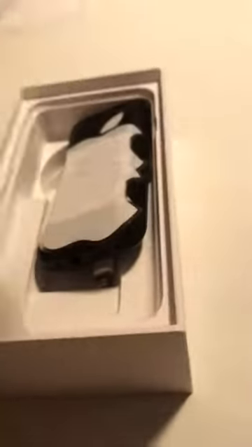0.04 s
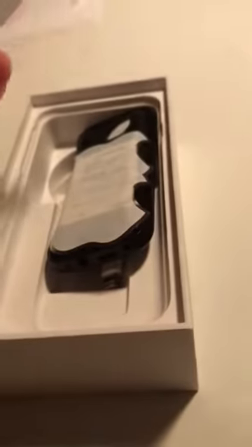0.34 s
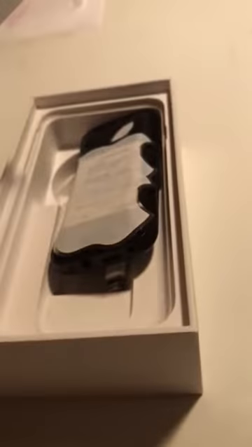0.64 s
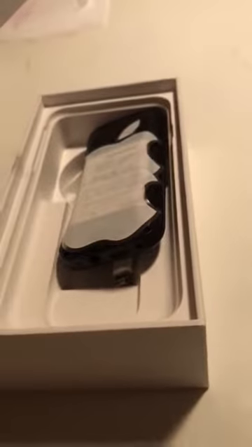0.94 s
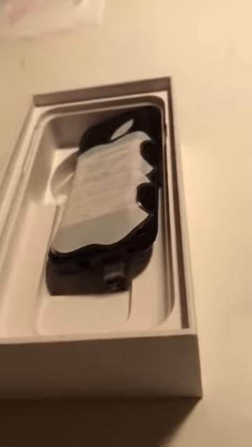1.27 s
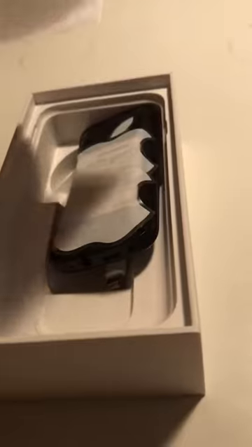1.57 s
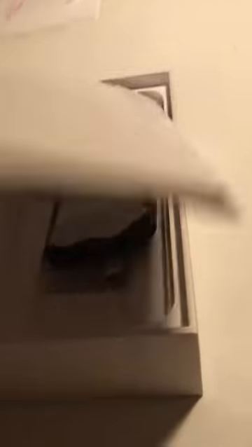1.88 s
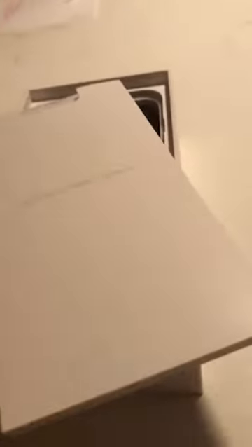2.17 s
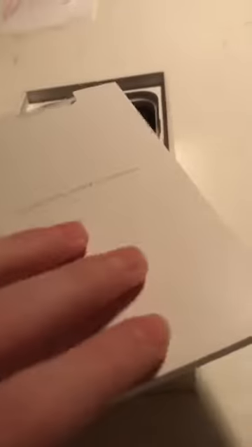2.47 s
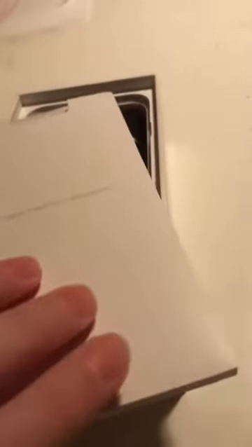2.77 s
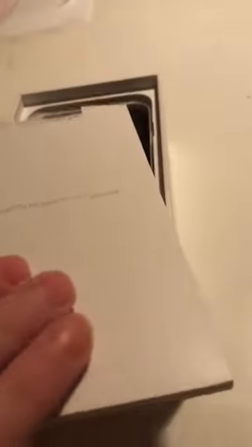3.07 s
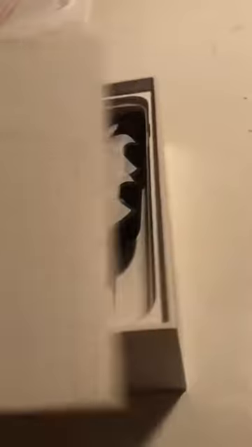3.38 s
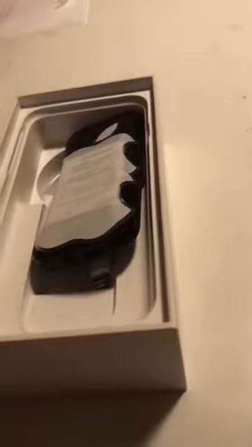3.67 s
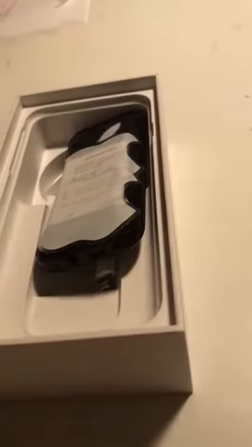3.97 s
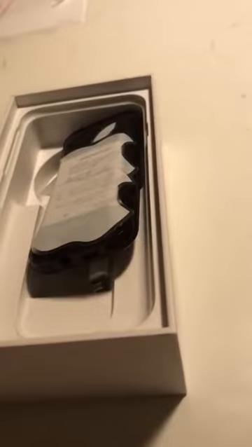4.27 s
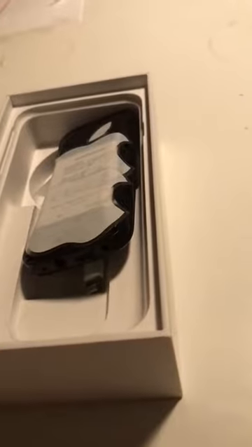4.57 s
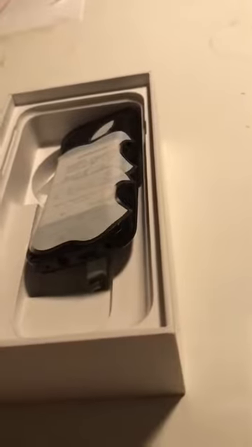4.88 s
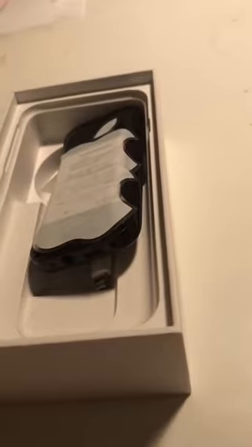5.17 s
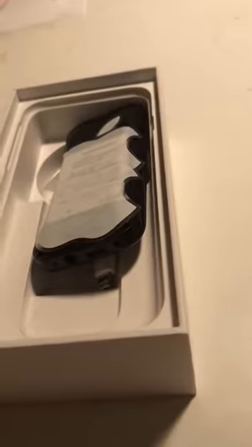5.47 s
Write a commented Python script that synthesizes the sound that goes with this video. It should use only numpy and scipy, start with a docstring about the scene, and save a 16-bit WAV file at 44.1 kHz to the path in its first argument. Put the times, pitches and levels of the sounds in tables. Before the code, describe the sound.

In a small, quiet room, a hand faintly slides a card sleeve, which catches and judders. It rasps over the rim of an open cardboard box and drops on it in a quick clatter, making the desk boom softly. Fingertips stroke the sleeve and draw it off. After two light nudges, a short scrape leads into one sharp click as a phone hits its tray. The microphone is close, with a low hum behind.

```python
"""An opened cardboard phone box stands on a desk in a small, quiet room with a low hum.
A hand slides a card sleeve about, fibres catching and juddering. The sleeve rasps over the rim and drops
on the box in a clatter of edge and face knocks that sets the desk booming. Fingertips stroke the sleeve
and draw it off again. The box is nudged twice, then a short scrape leads into one sharp click as the
phone snaps against its stiff tray. A faint hiss hangs on briefly after the loudest hits."""
import sys
import numpy as np
from scipy import signal
from scipy.fft import rfft, irfft
from scipy.io import wavfile
from scipy.ndimage import uniform_filter1d

SR = 44100
rng = np.random.default_rng(int(sys.argv[2]) if len(sys.argv) > 2 else 0)


def wav_out(sig):
    """Save sig, one row per channel (or a flat mono array), as 16-bit PCM at SR to the path in sys.argv[1]."""
    wavfile.write(sys.argv[1], SR, np.round(np.clip(np.atleast_2d(sig).T, -1, 1) * 32767).astype(np.int16))


N = 248724
TIME = np.arange(N) / SR

# Card knocks on the box edge first, then settles on its face with a clack and a thud.
# Each row: start in seconds, edge level in dB, edge pitch in Hz, grind time in seconds, crack in dB,
# delay until it settles in seconds, face level in dB, face pitch in Hz, thud in dB.
CARD_HITS = [(0.2773, -38.5, 2300, .003, -54, 0.001505, -39, 1750, -61),
             (1.8868, -26.5, 2400, 0.0061, -31, 0.0027, -30.5, 1200, -35),
             (1.894, -29, 1800, .007, -32, 0.0018, -34, 700, -37),
             (1.902, -28, 2100, 0.0087, -32, 0.0083, -45, 900, -37),
             (1.9252, -13, 2550, 0.0015, -23, .002, -32, 1700, -33),
             (1.938, -18.5, 740, .0005, -26, .002, -13.5, 1290, -41),
             (1.941, -24, 1800, .002, -33, .0024, -16.5, 1300, -41),
             (2.0702, -16.5, 720, .0007, -34, .0026, -13, 900, -34.5),
             (2.1094, -7, 4505, .0008, -14.5, .002, -13.5, 1500, -22),
             (2.1117, -12.5, 1450, .002, -23, .0033, -11.5, 1407, -31.5),
             (3.351, -39.5, 1600, 0.00299, -55, 0.013, -46.5, 620, -43),
             (3.3739, -28, 1050, .003, -35.5, .0012, -26.5, 640, -42.5),
             (4.0308, -31, 1613, .003, -37.5, .0046, -39.5, 700, -36),
             (4.168, -45, 1100, .003, -55, .0037, -41, 706, -42.5),
             (4.3239, -12.5, 3100, .001, -27.5, 0.0033, -26, 650, -35)]
# Weightless touches. Each row: start in seconds, level in dB, pitch in Hz, crack in dB.
LIGHT_TOUCHES = [(0.507, -62.5, 2300, -63), (0.538, -62, 5200, -57), (0.838, -58, 2200, -65),
                 (1.9209, -28, 2700, -33), (2.0714, -18.5, 2700, -33), (2.0987, -29, 3000, -41),
                 (2.1183, -28.5, 2700, -34), (2.578, -50, 2700, -63), (3.068, -57.5, 3900, -65),
                 (3.169, -45, 1500, -59.5), (4.1721, -43.5, 1400, -44), (4.3261, -18, 3600, -38.5)]
# The phone hits its tray and rebounds. Each row: start in seconds, strength in dB.
PHONE_SNAPS = [(4.324, 0.5), (4.3258, -10)]

# How each body rings. Each row: pitch in Hz, relative level in dB, time to fall 60 dB in seconds.
BOX_MODES = [(354, -18.5, .03), (535, -15.5, .011), (670, -11, 0.028), (975.4, -15, 0.043),
             (1236, -15, 0.0051), (1430, -12.5, 0.0078), (1656, -15.5, .013), (1850, -14.5, 0.01),
             (2290, -12.5, 0.0049), (2679, -11, 0.007), (3030, -10, .007), (3710, -13, 0.0086),
             (3930, -12, 0.0049), (5430, -18, 0.0046), (5900, -14, 0.0073), (8700, -18.5, 0.0052)]   # the box with its tray
THUD_MODES = [(74.2, -15, 0.022), (111, -6, 0.054), (176, -0.5, 0.047), (262, -18.5, 0.52),
              (308, -3.5, .035), (394.5, -4.5, 0.043)]   # the floor of the box on the desk
TRAY_MODES = [(1380, -15, 0.021), (1450, -16, .022), (1646, -22.5, 0.013), (1886, -11.5, 0.021),
              (2248, -16.5, 0.0098), (2757, -14, 0.0111), (3062, -11, 0.01), (3860, -18, .009),
              (5280, -20.5, .006), (6040, -17, 0.00695), (8300, -27, 0.0059)]   # the stiff tray
DESK_MODES = [(49.9, -36.5, 0.87), (68.5, -45.5, 1.5), (130, -44.5, 1.15)]   # the desk top

# Card and fingers rubbing. Each row: gesture, then start, attack, hold and release in seconds,
# then level and brightness in dB, both before the gesture's own trim.
RUBS = [("slide", 0.0, 0.0023, .16, 0.05, -60, -4.5), ("slide", 0.1595, 0.073, 0.049, 0.023, -58.5, 6.9),
        ("slide", 0.287, 0.013, 0.019, 0.11, -53.5, -0.91), ("slide", 1.446, .018, .005, .035, -59.5, -3.5),
        ("slide", 1.505, .04, .05, .06, -59, .5), ("slide", 1.65, 0.094, .03, .04, -65, -7.5),
        ("rasp", 1.778, .016, .135, .025, -53, -2), ("stroke", 2.513, 0.016, 0.0035, 0.049, -50, 2),
        ("stroke", 2.615, 0.12, .008, 0.019, -51.5, 2), ("drag", 2.74, 0.023, 0.042, 0.062, -58.5, -18),
        ("drag", 2.84, .03, .015, 0.031, -59.5, -9.5), ("drag", 2.91, .015, 0.074, 0.038, -58, -8.5),
        ("drag", 3.115, 0.037, .025, 0.037, -61.5, -15.5), ("drag", 3.19, 0.11, 0.033, .06, -58.5, -12.5),
        ("scrape", 4.294, .006, .01, .018, -41.5, -17)]
# The tone of each gesture. Each row: frequency in Hz, relative noise density in dB.
SLIDE_COLOUR = [(590, -42), (1000, -14.5), (1310, -13.5), (1850, 1.5), (2470, -9), (3050, 0.5), (4840, -9),
                (7270, -6), (7880, -7), (10700, -9), (12300, -5), (15100, -9), (16000, -13.5)]   # card sliding on card
RASP_COLOUR = [(530, -43), (900, -11), (1250, -15.5), (1830, 0), (2330, -9), (2960, -3), (3340, -7),
               (3860, 1), (4310, -10), (5040, -2.5), (7140, -13), (9090, -5), (10000, -16), (13700, -8.5),
               (16000, -20)]   # the sleeve's edge on the rim before it lands
STROKE_COLOUR = [(240, -39), (400, -15.5), (676, -2), (1090, -6), (1560, 0), (1990, -3.5), (2750, 3),
                 (3310, -3.5), (5030, -6), (5690, -13), (10700, -22), (11900, -21.5), (16000, -32)]   # fingertips skidding over the sleeve
DRAG_COLOUR = [(240, -51.5), (400, -24), (439, -3.5), (512, -23.5), (676, 1.5), (893, -9), (994, -4),
               (2550, -5), (3310, -10.5), (4650, -11.5), (6640, -25.5), (7870, -27), (16000, -39)]   # the sleeve drawn away over the rim
SCRAPE_COLOUR = [(410, -53), (700, -20.5), (1310, -14.5), (1920, 0.5), (2330, -14.5), (3160, -4.5),
                 (4380, -11.5), (4990, -26.5), (6070, -24.5), (16000, -37)]   # the lead-in to the click
# The sleeve judders in short fits. Each row: start in seconds, hold in seconds, level in dB.
JUDDER_FITS = [(0.31, .03, -47), (0.365, 0.0026, -46), (0.389, 0.0055, -49), (0.422, .002, -52)]
# The hand leans on the desk. Each row: centre in seconds, pitch in Hz, level in dB, half-width in seconds.
HAND_PUSHES = [(0.205, 66, -48, .022), (0.2, 265, -57, .018)]

# The room's reverb. Each row: frequency in Hz, time to fall 60 dB in seconds, echo level in dB.
ROOM_DECAY = [(100, 0.76, -12), (298, 0.64, -4.5), (686, 0.35, -7), (1500, 0.57, -8.5), (3035, 0.58, -13.5),
              (6000, .4, -12), (14170, .24, -15)]
# The noise beds. Each row: frequency in Hz, relative noise density in dB.
AIR_COLOUR = [(15, -39.5), (25, -11.5), (53, -2), (76, -12), (92, -6), (127, -10), (263, -11), (416, -18),
              (516, -14), (714, -19), (840, -19.5), (2050, -29.5), (2910, -29.5), (12900, -39.5),
              (16000, -42)]   # still air
HISS_COLOUR = [(300, -5.5), (1000, 0), (3000, 3), (8000, 1), (16000, -7.5)]   # microphone hiss
# The hum swells now and then. Each row: start, attack, hold and release in seconds, level in dB.
HUM_SWELLS = [(2.001, .6, 1.3, .3, -70), (4.04, .13, .14, .12, -56), (5.1, .4, .2, .2, -69)]


def clatter(face_grind_s=.001, face_crack_db=-22.5, touch_grind_s=.0018):
    """The edge strikes, then the face lands and thuds the box into the desk; light touches only tick."""
    lead = SR // 300   # samples of run-up before each peak
    knocks, thumps = np.zeros(N), np.zeros(N)
    for s, db, hz, grind_s, crack_db, settle_s, face_db, face_hz, thud_db in CARD_HITS:
        add(knocks, s - lead / SR, card_knock(db, hz, grind_s, crack_db, lead))
        face = card_knock(face_db, face_hz, face_grind_s, face_db + face_crack_db, lead)
        add(knocks, s + settle_s - lead / SR, face)
        add(thumps, s + settle_s, from_db([thud_db]))
    for s, db, hz, crack_db in LIGHT_TOUCHES:
        add(knocks, s - lead / SR, card_knock(db, hz, touch_grind_s, crack_db, lead))
    return knocks + excite(thumps, ringing(THUD_MODES, TIME[:SR // 2], np.sin))


def card_knock(db, hz, grind_s, crack_db, lead, attack_db=7, grit_db=-14, rise_s=.00053, crack_t60=.014):
    """One contact rings the box in a band around its pitch and cracks at the edge."""
    t, modes = TIME[:SR // 16], np.array(BOX_MODES)
    before, after = np.maximum(t[lead] - t, 0), np.maximum(t - t[lead], 0)
    grit, crack_noise, chance = rng.standard_normal((3, len(t)))
    modes[:, 1] += 1.5 * chance[:len(modes)]   # where the blow falls favours some modes
    box = ringing(modes, t, np.cos)
    box[0] += from_db(attack_db)   # the contact itself is heard before the walls ring
    give = np.exp(-before / rise_s)   # card gives a little before it bears the load
    force = grit * from_db(grit_db) * give * np.exp(-after / grind_s)   # the edge grinds on for a moment
    force[lead] = 1
    spread = 1.33 * (grind_s * 1000) ** .19   # longer contacts cover a wider band
    low_hz, high_hz = hz / spread, hz * spread
    knock = cut(cut(excite(force, box), low_hz, "high"), high_hz, "low")
    knock *= np.sqrt(SR / 1000) / np.linalg.norm(knock)   # the energy of 1 ms at full level
    crack = crack_noise * give * from_db(crack_db - 60 * after / crack_t60)
    crack = cut(crack, 2500, "high", order=1)
    crack = cut(crack, max(7500, 2.9 * high_hz), "low")   # harder contacts crack brighter
    return from_db(db) * knock + crack


def phone_snap(low_hz=1350, top_hz=8000):
    """The phone strikes the hard tray and rebounds so fast that it reads as one bright click."""
    tray, click = ringing(TRAY_MODES, TIME[:SR // 12], np.sin), np.zeros(N)
    for s, db in PHONE_SNAPS:
        add(click, s, from_db(db) * tray)
    return cut(cut(click + 1e-18, low_hz, "high", order=4), top_hz, "low", order=1)


def rub(gesture, spectrum, gain_db, bright_db, grain_db, flutter_db, split_hz=6000):
    """Paper fibres catch and let go in dense, uneven grains; a quicker stroke is louder and brighter."""
    grip = from_db(grain_db * drift(1500) + flutter_db * drift(90))
    body = cut(colour(rng.standard_normal(N) * grip, spectrum), split_hz, "low")
    body /= np.std(cut(body, 1500, "high"))   # the upper mids set the level
    fizz = colour(rng.standard_normal(N) * grip, spectrum)
    fizz = rms_one(cut(fizz, split_hz, "high", order=3))
    out = np.zeros(N)
    for kind, s, attack_s, hold_s, release_s, db, fizz_db in RUBS:
        if kind == gesture:
            speed = envelope(s, attack_s, hold_s, release_s)
            loudness = from_db(db + gain_db) * speed ** .85
            brightness = from_db(fizz_db + bright_db) * speed ** .67
            out += loudness * (body + brightness * fizz)
    return out


def sleeve_judder(slips_per_s=138, jitter=.066, panel_hz=150, panel_t60=.045, tick_db=-7):
    """Stick and slip: every slip flexes the card and leaves a tiny tick."""
    t = TIME[:SR // 8]
    slip_count = np.cumsum(slips_per_s * (1 + jitter * drift(100))) / SR
    slips = np.diff(np.floor(slip_count), prepend=0)
    flex = excite(slips, ringing([(panel_hz, 0, panel_t60)], t, np.sin))
    ticks = excite(slips * from_db(2.2 * drift(150.5)), ringing(BOX_MODES, t, np.cos))
    level = sum(from_db(db) * envelope(s, attack_s=.0068, hold_s=hold_s, release_s=.013)
                for s, hold_s, db in JUDDER_FITS)
    return level * (rms_one(cut(flex, 66, "high")) + from_db(tick_db) * rms_one(cut(ticks, 1100, "high")))


def desk_boom(landing_s=2.112):
    """The desk top booms on softly after the sleeve's full weight lands."""
    boom = np.zeros(N)
    add(boom, landing_s, ringing(DESK_MODES, TIME[:2 * SR], np.sin))
    return boom


def hand_pushes():
    """Soft pressure on the desk makes a low swell with no click."""
    return sum(from_db(db) * np.exp(-((TIME - s) / width_s) ** 2) * np.sin(2 * np.pi * hz * TIME)
               for s, hz, db, width_s in HAND_PUSHES)


def room_reverb(x, first_echo_s=.0035, build_s=.0058):
    """Diffuse echoes die away in half-octave bands, the highest treble first."""
    t, edges_hz = TIME[:SR], 70 * 2 ** (np.arange(17) / 2)
    white, tail = rng.standard_normal((2, SR)), 0
    onset = np.clip((t - first_echo_s) / build_s, 0, 1)
    for k, band in enumerate(zip(edges_hz, edges_hz[1:])):
        hz = np.sqrt(band[0] * band[1])
        t60, db = at_hz(ROOM_DECAY, hz), at_hz(ROOM_DECAY, hz, column=2)
        fade = from_db(-60 * t / t60) * onset
        tail += from_db(db) * cut(white[k % 2], band, "band") * fade / np.linalg.norm(fade)
    return excite(x, tail)


def room_tone(air_db=-63, hum_hz=49, hum_db=-75.5, waver=.22):
    """A bed of still air and a low hum that wavers and swells."""
    hum = np.sqrt(2) * np.sin(2 * np.pi * hum_hz * TIME + waver * drift(6))
    hum *= 1 + waver * drift(4.6)
    swells = sum(from_db(db) * envelope(*timing) for *timing, db in HUM_SWELLS)
    air = from_db(air_db) * colour(rng.standard_normal(N), AIR_COLOUR)
    return air + (from_db(hum_db) + swells) * hum


def suppressor_hiss(x, open_db=-27, hold_s=.402, hiss_db=-65):
    """A loud sound opens the noise suppressor, which lets hiss through until its hold runs out."""
    loud = uniform_filter1d(x ** 2, size=128) > from_db(open_db) ** 2
    last_loud_s = np.maximum.accumulate(np.where(loud, TIME, -1))
    is_open = TIME - last_loud_s < hold_s
    return is_open * from_db(hiss_db) * colour(rng.standard_normal(N), HISS_COLOUR)


def from_db(db):
    """Decibels to gain."""
    return 10 ** (np.asarray(db) / 20)


def rms_one(x):
    """Scale to rms 1."""
    return x / np.sqrt(np.mean(x ** 2) + 1e-20)


def at_hz(points, hz, column=1):
    """Read a column of a table on a log-frequency axis."""
    points = np.array(points)
    return np.interp(np.log(np.maximum(hz, 1)), np.log(points[:, 0]), points[:, column])


def cut(x, hz, kind, order=2):
    """A high-, low- or band-pass filter."""
    return signal.sosfilt(signal.butter(order, np.clip(hz, 10, .45 * SR), kind, fs=SR, output="sos"), x)


def colour(x, spectrum):
    """Shape a noise with an EQ curve; rms 1."""
    gain = from_db(at_hz(spectrum, np.fft.rfftfreq(N, 1 / SR)))
    return rms_one(irfft(rfft(x) * gain, N))


def drift(rate):
    """A modulator gliding to a new random value `rate` times a second."""
    knots = rng.standard_normal(int(rate * N / SR) + 2)
    return np.interp(TIME * rate, np.arange(len(knots)), knots)


def envelope(s, attack_s, hold_s, release_s):
    """Rise from 0 to 1, hold, fall back."""
    return np.interp(TIME, s + np.cumsum([0, attack_s, hold_s, release_s]), [0, 1, 1, 0])


def ringing(modes, t, wave):
    """A body's answer to one tap: a sum of dying waves."""
    return sum(from_db(db - 60 * t / t60) * wave(2 * np.pi * hz * t) for hz, db, t60 in modes)


def excite(x, response):
    """Play a signal through an impulse response, keeping its length."""
    return signal.fftconvolve(x, response)[:len(x)]


def add(track, s, sound):
    """Mix a sound in at `s` seconds."""
    start = int(round(s * SR))
    track[start:start + len(sound)] += sound[:N - start]


def scene():
    """Close-up handling in mono, with the room behind it."""
    slides = rub("slide", SLIDE_COLOUR, gain_db=-0.5, bright_db=0.8, grain_db=1.0, flutter_db=2.5)
    rasp = rub("rasp", RASP_COLOUR, gain_db=0.8, bright_db=0.0, grain_db=0.5, flutter_db=2.0)
    strokes = rub("stroke", STROKE_COLOUR, gain_db=-0.5, bright_db=3.0, grain_db=2.5, flutter_db=1.7)
    drag = rub("drag", DRAG_COLOUR, gain_db=-1.6, bright_db=6.0, grain_db=2.0, flutter_db=1.1)
    scrape = rub("scrape", SCRAPE_COLOUR, gain_db=1.4, bright_db=3.5, grain_db=3.5, flutter_db=1.5)
    rubbing = slides + rasp + strokes + drag + scrape
    near = clatter() + phone_snap() + rubbing + sleeve_judder() + hand_pushes()
    return (near + room_reverb(near) + desk_boom() + room_tone())[None]


def record(dry, low_hz=42, top_hz=16000):
    """The microphone drops the deepest bass, hiss follows loud knocks, peaks clip and the top is cut."""
    x = np.clip(cut(dry, low_hz, "high", order=8) + suppressor_hiss(dry[0]), -.9, .9)
    return signal.sosfilt(signal.ellip(14, .1, 100, top_hz, fs=SR, output="sos"), x)


dry = scene()
out = record(dry)
wav_out(out)
```